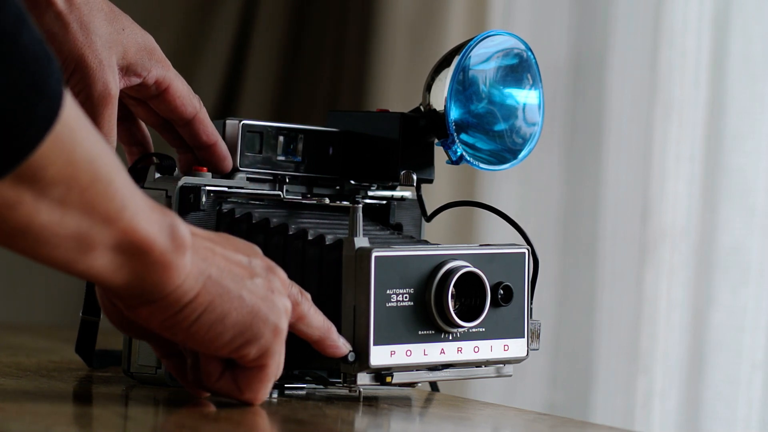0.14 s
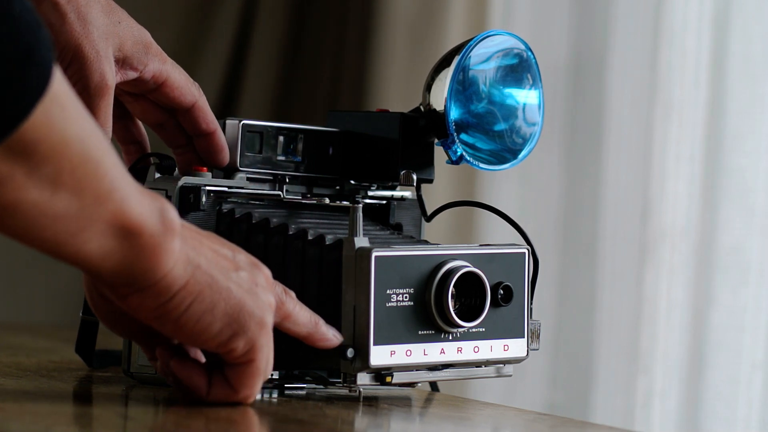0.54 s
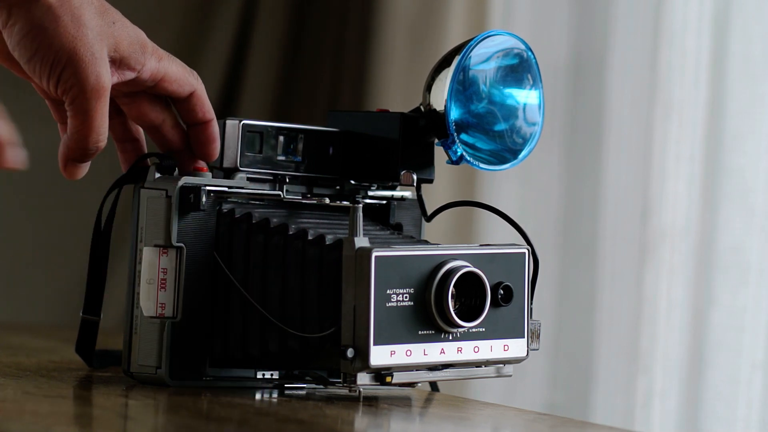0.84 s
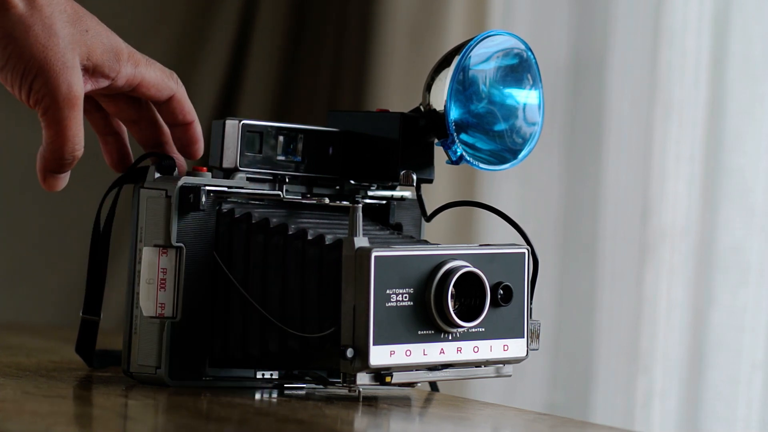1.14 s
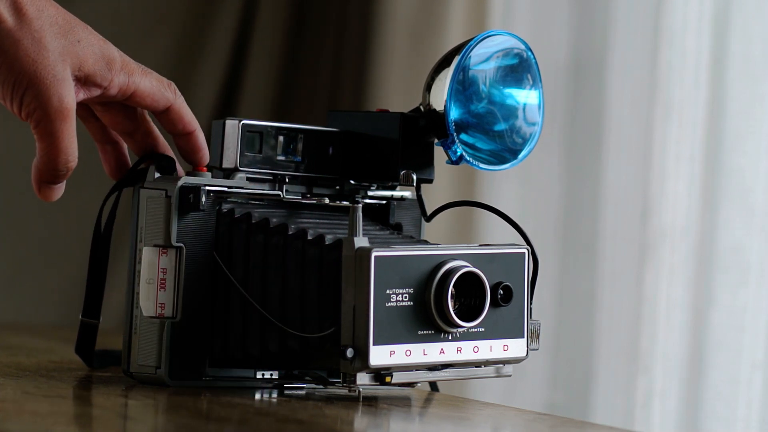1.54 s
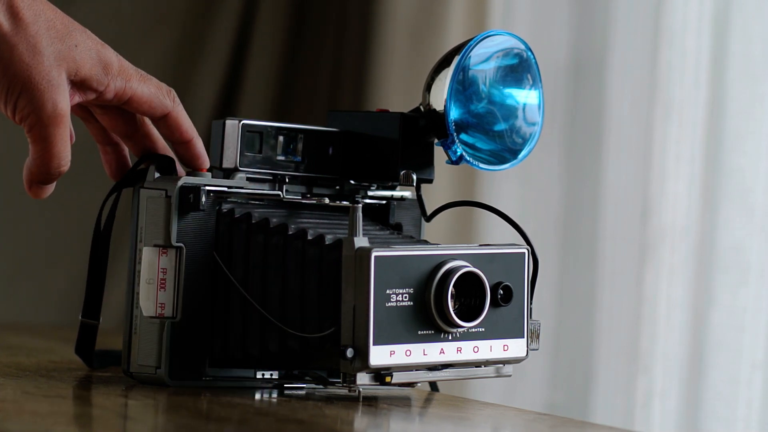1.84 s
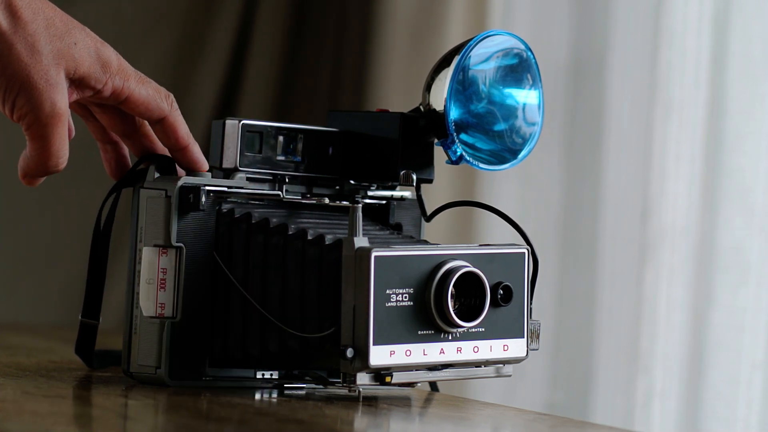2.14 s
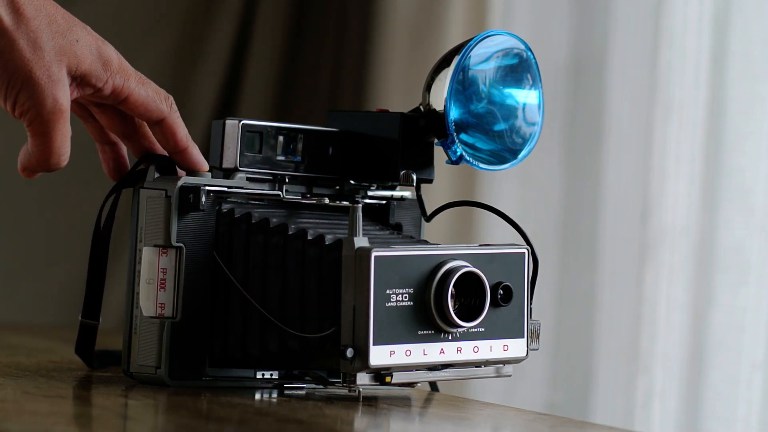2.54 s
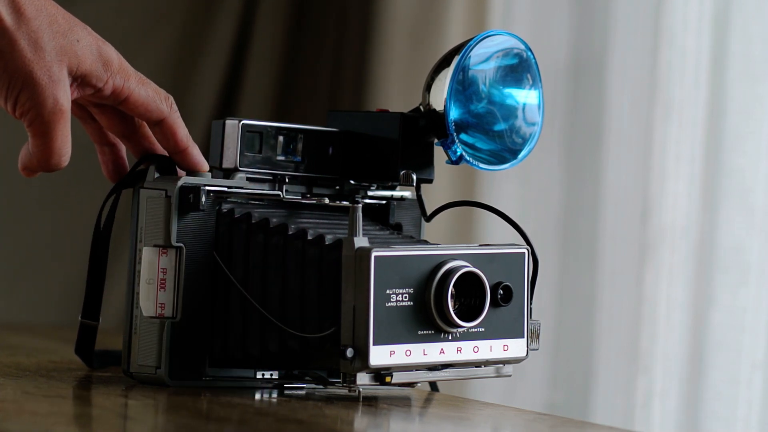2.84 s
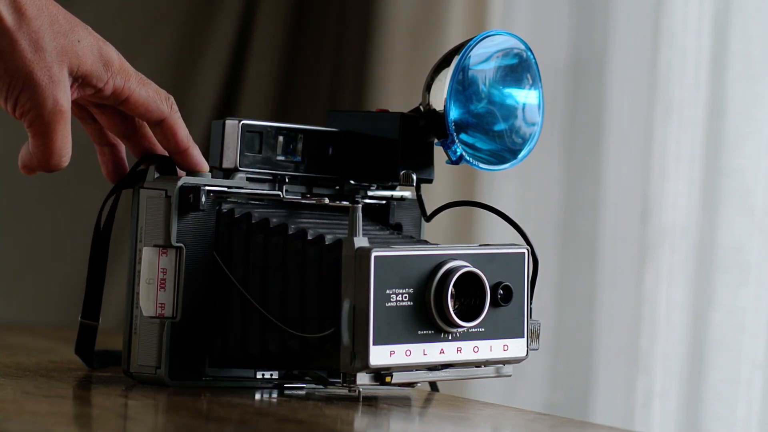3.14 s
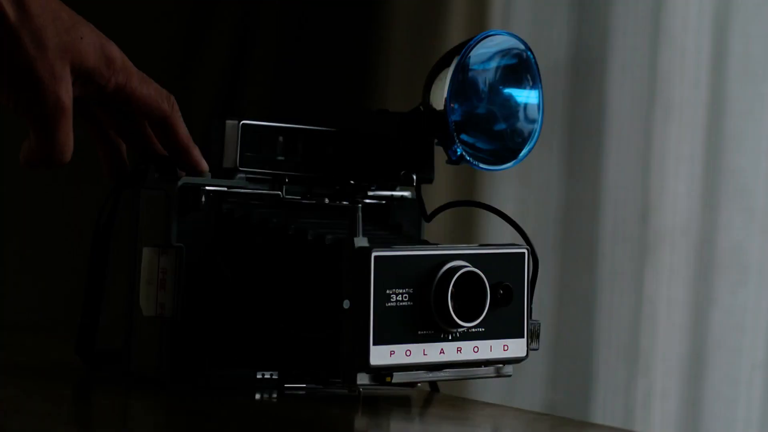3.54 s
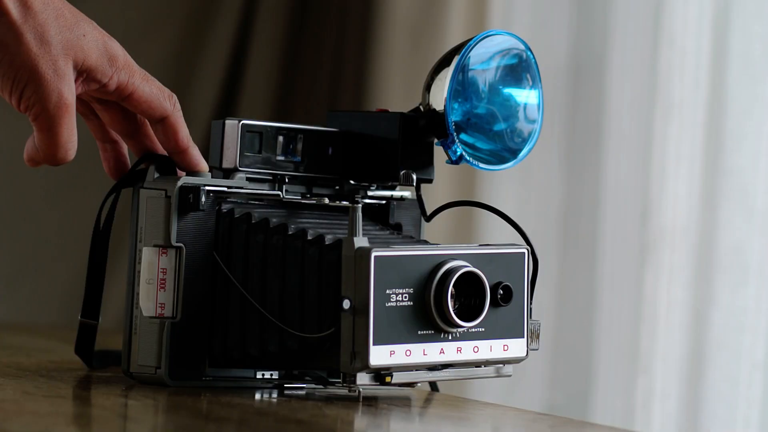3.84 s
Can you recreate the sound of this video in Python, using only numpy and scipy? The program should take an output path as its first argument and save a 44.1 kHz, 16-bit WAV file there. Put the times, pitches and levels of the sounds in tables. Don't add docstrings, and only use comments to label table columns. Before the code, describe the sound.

An old folding camera, close in stereo in a small room with steady hiss and faint low hum. At 0.0 s the cocking lever knocks, and its latch snaps at 0.1. Faint finger ticks come at 0.5 and 0.9, a soft touch at 2.1. At 3.18 the shutter clacks and rattles, at 3.22 the flashbulb cracks loudly, glass fizzing briefly; the blade clicks back at 3.36, then slight settling ticks.

```python
import sys
import numpy as np
from scipy import signal
from scipy.fft import rfft, irfft
from scipy.io import wavfile
from scipy.ndimage import uniform_filter1d

SR = 44100
rng = np.random.default_rng(int(sys.argv[2]) if len(sys.argv) > 2 else 0)


def unload_audio(sound):
    columns = np.transpose(np.atleast_2d(sound))
    steps = np.round(np.clip(columns, -1, 1) * 32767)
    wavfile.write(sys.argv[1], SR, steps.astype(np.int16))


def gain_from_decibels(decibels):
    exponent = np.asarray(decibels, float) / 20
    return 10 ** exponent


N = 176400
T = np.arange(N) / SR
HZ = np.maximum(np.arange(N // 2 + 1) * SR / N, 1)

# (time [s], level [dB], chatter length [s], ring-out t60 [s])
BULB_CONTACTS = [
    (3.2188, -23, .001, .006),
    (3.2209, -6, .0008, .0025),
    (3.2222, -19, .001, .012),
    (3.2268, -21, .0008, .012),
]
SHARD_CONTACTS = [
    (3.2234, -20, .001, .006),
]
FIZZ_CONTACTS = [
    (3.229, -37, 0.005, 0.04),
    (3.238, -30, 0.025, 0.17),
    (3.264, -31, .001, 0.016),
    (3.275, -34, .001, .03),
]
SHUTTER_CONTACTS = [
    (3.1735, -39.5, .002, .01),
    (3.176, -28, 0.0016, 0.0158),
    (3.178, -16.5, 0.00069, 0.03),
    (3.181, -20.5, 0.0047, 0.021),
    (3.189, -20.5, 0.0056, 0.03),
    (3.196, -41, 0.0017, .05),
    (3.205, -28, 0.0031, 0.076),
    (3.217, -27, 0.0035, 0.055),
]
RETURN_CONTACTS = [
    (3.3597, -34, 0.00079, .012),
    (3.361, -36, 0.025, 0.077),
    (3.3652, -31.5, 0.0014, 0.0103),
    (3.3705, -33, .001, .01),
    (3.374, -43.5, 0.00091, .01),
    (3.3797, -37, 0.00055, .008),
    (3.53, -51.5, .002, 0.042),
]
LEVER_CONTACTS = [
    (.0105, -31.5, 0.0023, 0.019),
    (.0165, -32.5, 0.0021, 0.012),
    (.022, -49, 0.004, 0.03),
    (.030, -42, .012, 0.07),
    (.062, -52, 0.0091, 0.073),
]
LATCH_CONTACTS = [
    (.1073, -30, 0.00064, 0.011),
    (.1098, -43.5, 0.0027, .008),
    (.1132, -31.5, 0.00065, 0.0063),
    (.115, -44, 0.0027, 0.17),
]

# (frequency [Hz], level per Hz [dB])
BULB_COLOUR = [(180, -52), (300, -16), (2280, -17), (3140, -8), (4170, -13), (5740, -10), (9330, 0),
               (14700, -3), (16500, -22)]
FIZZ_COLOUR = [(880, -39), (1500, -11), (1920, 2), (2210, -18), (3180, -2), (12700, 3.5), (16000, -21)]
SHUTTER_COLOUR = [(88, -37), (150, -27), (669, -3.5), (2260, -3), (4970, -1.5), (5480, -3), (8790, -0.5),
                  (15000, -4.5), (16500, -37)]
RETURN_COLOUR = [(880, -69), (1500, -38), (1830, -28), (2630, -22), (5640, -1.5), (7540, -1), (15200, -4),
                 (16500, -34)]
LEVER_COLOUR = [(120, -67), (200, -37), (1050, -1.5), (1470, -17), (2050, -9), (5060, -22), (13000, -21),
                (16500, -37)]
LATCH_COLOUR = [(590, -48), (1000, -13), (1720, -23), (3010, -11), (7700, -11), (10900, 1.5), (15000, -17),
                (16500, -39)]

# (frequency [Hz], width [Hz], level [dB])
BULB_MODES = [(705, 78, -16), (1940, 170, -9), (3220, 200, 2), (6060, 230, 3), (7600, 210, 5),
              (8680, 300, 4), (10570, 540, 9), (11800, 200, 9.5), (13000, 230, -16)]
SHUTTER_MODES = [(307, 30, 0), (727, 60, -10), (1010, 71, 3), (2020, 67, -1), (2460, 120, -10),
                 (3120, 190, 0), (4400, 100, -8), (5100, 150, 1), (5900, 150, -4), (7350, 140, 4),
                 (8440, 142, 0), (11900, 220, -16)]
RETURN_MODES = [(3480, 220, -15), (5300, 136, -2), (5800, 153, 2), (6650, 180, -8), (7700, 200, 0),
                (9250, 300, -2), (11530, 340, 3), (12700, 310, -16)]
LEVER_MODES = [(580, 60, -8), (711, 30, 1), (904, 30, -9), (1040, 44, -1), (1170, 32, -5), (2080, 87, -9.5),
               (2730, 160, -8), (3610, 100, -19), (4510, 150, -13)]
LATCH_MODES = [(2110, 140, -6), (2580, 260, -8), (3000, 290, 2), (2980, 51, 1), (5400, 340, -8),
               (5810, 260, 1), (6400, 200, 0.5), (10900, 400, -7), (12000, 500, -12)]

# (time [s], level [dB], centre [Hz], width [Hz], length [s])
NOISE_PUFFS = [(0.516, -43, 5500, 5000, .0012), (0.51, -54, 4300, 5800, 0.034),
               (.519, -50.5, 2050, 690, 0.0078), (0.554, -55.5, 860, 500, 0.016),
               (0.9169, -35, 13080, 3000, 0.001), (.917, -50.5, 4900, 2500, .001),
               (0.924, -54, 130, 260, 0.02), (2.086, -52, 1030, 70, 0.024), (2.082, -55, 880, 70, .03),
               (2.09, -54, 710, 70, .024), (2.085, -55, 480, 260, .04), (2.106, -52, 520, 160, 0.022),
               (2.122, -58, 320, 140, 0.023), (3.454, -49, 11700, 900, .004),
               (3.463, -51, 11800, 400, .018), (3.461, -51, 15200, 500, .006),
               (3.47, -51, 11000, 900, .005), (3.538, -56, 3300, 300, .012),
               (3.533, -53, 11700, 900, .008), (3.3605, -42, 3200, 1200, .003),
               (3.366, -44, 3200, 1200, .005), (0.032, -41, 690, 110, 0.026), (.033, -43, 1000, 240, .024),
               (.066, -48, 900, 320, .022), (.1078, -36, 2900, 900, .0016), (.1145, -37, 3050, 500, .005),
               (3.179, -19.5, 3640, 1500, 0.0041), (3.189, -30, 700, 90, .016),
               (3.191, -31, 1090, 150, .016), (3.192, -31, 2050, 120, .012), (3.205, -53, 93, 48, 0.04),
               (3.2, -42, 300, 120, 0.035), (3.213, -38, 520, 260, .02), (3.228, -36, 690, 160, .007),
               (3.26, -34, 14000, 1500, 0.056)]

# (frequency [Hz], t60 [s])
ROOM_DECAY = [(200, 0.49), (800, 0.31), (3000, 0.36), (8000, 0.25), (15000, 0.23)]
# (frequency [Hz], level per Hz [dB])
AIR_COLOUR = [(13, -48), (22, -15), (43, -7), (76, -7.5), (307, -2.5), (803, -5.5), (1120, -6.5),
              (1210, -8), (15600, -16.5)]
# (frequency [Hz], likeness [0-1])
AIR_LIKENESS = [(40, 0.66), (130, 0.068), (290, 0.16), (1400, 0.21), (3000, 0)]
# (frequency [Hz], width [Hz], level [dB])
HUM_BANDS = [(49.5, 7.7, -68.5), (253.7, 10, -71), (1141, 3.2, -68)]
# (time [s], length [s], lowest frequency [Hz])
TREBLE_DIPS = [
    (.1005, .007, 4000),
    (.120, .008, 13200),
    (3.171, .005, 1200),
    (3.2135, .004, 11000),
    (3.356, .004, 12500),
]

GRAIN_DB, ATTACK_S = 1.8, .0002
BASS_CUT_HZ = 260
NARROWEST_HZ = 30
RING_WET = 0.14
UNLIKE_HZ = 7900
ROOM_GAP_S, ROOM_BUILD_S = 0.006, 0.018
AIR_DB, AIR_PAN_DB, AIR_TOP_HZ = -51, 0.8, 15800
SWAY_DB, SWAY_PER_S = 0.74, 9
CLIP_LEVEL, TOP_HZ = .74, 16150


def bulb():
    return part(BULB_CONTACTS, BULB_COLOUR, BULB_MODES, ring_db=1, pan_db=-0.6, wet_db=-6)


def shards():
    return part(SHARD_CONTACTS, BULB_COLOUR, BULB_MODES[3:6], ring_db=1.5, pan_db=-14, wet_db=-5.0)


def fizz():
    return part(FIZZ_CONTACTS, FIZZ_COLOUR, BULB_MODES, ring_db=-18, pan_db=-1.0, wet_db=-7)


def shutter():
    return part(SHUTTER_CONTACTS, SHUTTER_COLOUR, SHUTTER_MODES, ring_db=3, pan_db=-2.5, wet_db=-7)


def blade_return():
    return part(RETURN_CONTACTS, RETURN_COLOUR, RETURN_MODES, ring_db=6.0, pan_db=0.0, wet_db=-5.5)


def lever():
    return part(LEVER_CONTACTS, LEVER_COLOUR, LEVER_MODES, ring_db=12.5, pan_db=-2.5, wet_db=-15.0)


def latch():
    return part(LATCH_CONTACTS, LATCH_COLOUR, LATCH_MODES, ring_db=9.5, pan_db=-1.5, wet_db=-7.5)


def part(contacts, colour, modes, ring_db, pan_db, wet_db):
    force = np.zeros(N)
    ticks = np.zeros(N)
    for k, (start, db, hold, t60) in enumerate(contacts):
        attack = (T > start) * np.clip((T - start) / ATTACK_S, 0, 1)
        fade = 1000. ** -(np.clip(T - start - hold, 0, 1) / max(t60, .002))
        force += gain_from_decibels(db) * attack * fade
        ticks[int(start * SR)] += (-1) ** k * gain_from_decibels(db)
    grain = uniform_filter1d(rng.standard_normal(N), size=12) * np.sqrt(12)
    push = force * gain_from_decibels(GRAIN_DB * grain) * pair() + ticks
    push = signal.lfilter(*signal.butter(2, BASS_CUT_HZ, "high", fs=SR), push)
    crack = signal.lfilter(causal(colour), 1, push)
    ringing = sum(gain_from_decibels(db) * ring(push, hz, max(width, NARROWEST_HZ)) for hz, width, db in modes)
    metal = gain_from_decibels(ring_db) * ringing
    direct = (crack + metal) * pan(pan_db)
    to_room = gain_from_decibels(wet_db) * (crack + RING_WET * metal)
    return np.array([direct, to_room])


def small_puffs():
    noise = pair()
    puffs = np.zeros((2, N))
    for time, db, hz, width, length in NOISE_PUFFS:
        swell = np.exp(-.5 * ((T - time) / (0.41 * length)) ** 2)
        puffs += gain_from_decibels(db) * swell * unit(ring(ring(noise, hz, width), hz, width))
    return puffs


def room(x):
    t = T[:SR // 2]
    tail = np.zeros((2, len(t)))
    for hz in 150 * 2 ** np.arange(0, 7., .5):
        band = ring(rng.standard_normal((2, len(t))), hz, hz / 2)
        tail += band * 1000. ** -(t / curve(ROOM_DECAY, hz))
    tail *= np.clip((t - ROOM_GAP_S) / ROOM_BUILD_S, 0, 1)
    tail /= np.sqrt(np.sum(tail ** 2) / 2)
    return signal.fftconvolve(x, tail, axes=1)[:, :N]


def air():
    return (gain_from_decibels(AIR_DB + 3) * hiss() + hum()) * pan(AIR_PAN_DB)


def hiss():
    alike = np.clip(curve(AIR_LIKENESS, HZ), 0, 1)
    spectrum = gain_from_decibels(curve(AIR_COLOUR, HZ)) * (HZ < AIR_TOP_HZ)
    noise = unit(stereo(np.sqrt(1 + alike) * spectrum, np.sqrt(1 - alike) * spectrum))
    hold = int(SR / SWAY_PER_S)
    steps = np.repeat(rng.standard_normal(N // hold + 1), hold)
    sway = uniform_filter1d(steps, hold)[:N]
    return noise * gain_from_decibels(SWAY_DB * sway)


def hum():
    return sum(gain_from_decibels(db) * unit(ring(ring(pair(), hz, width), hz, width)) for hz, width, db in HUM_BANDS)


def pair():
    alike = 1 / (1 + (HZ / UNLIKE_HZ) ** 2)
    return stereo(np.sqrt((1 + alike) / 2), np.sqrt((1 - alike) / 2))


def stereo(mid_gain, side_gain):
    mid, side = rfft(rng.standard_normal((2, N)))
    return irfft(mid * mid_gain + side * side_gain * np.array([[1], [-1]]), N)


def pan(db):
    return gain_from_decibels(np.array([[db], [-db]]) / 2)


def ring(x, hz, width):
    return signal.lfilter(*signal.iirpeak(min(hz, .45 * SR), hz / max(width, 1), fs=SR), x)


def causal(colour):
    hz = np.maximum(np.arange(257) * SR / 512, 1)
    cepstrum = irfft(curve(colour, hz) * np.log(10) / 20)
    cepstrum[1:256] *= 2
    cepstrum[257:] = 0
    response = irfft(np.exp(rfft(cepstrum)))
    return response / np.sqrt(np.sum(response ** 2))


def curve(table, hz):
    points = np.array(table)
    return np.interp(np.log(hz), np.log(points[:, 0]), points[:, 1])


def unit(x):
    return x / np.sqrt(np.mean(x ** 2))


def scene():
    direct, to_room = lever() + latch() + shutter() + bulb() + shards() + fizz() + blade_return()
    soft_sounds = small_puffs()
    return direct + soft_sounds + room(to_room + gain_from_decibels(-8.5) * soft_sounds) + air()


def low_pass(x, hz):
    return signal.sosfilt(signal.ellip(8, .2, 70, hz, fs=SR, output="sos"), x)


def top_cut(x):
    return signal.sosfilt(signal.butter(12, 16970, fs=SR, output="sos"), x)


def record(dry):
    x = low_pass(dry, TOP_HZ)
    x = low_pass(np.clip(x, -CLIP_LEVEL, CLIP_LEVEL), 16900)
    for time, length, hz in TREBLE_DIPS:
        treble = signal.sosfiltfilt(signal.butter(4, hz, "high", fs=SR, output="sos"), x)
        x = x - treble * np.clip(3 - 6 * np.abs(T - time) / length, 0, 1)
    return top_cut(x)


dry = scene()
out = record(dry)
unload_audio(out)
```